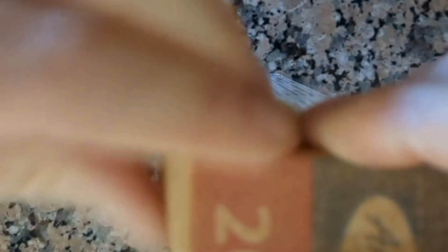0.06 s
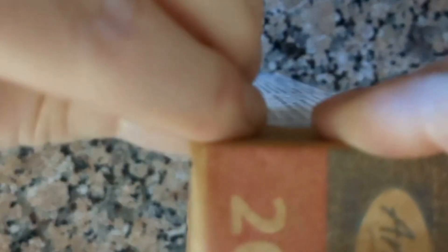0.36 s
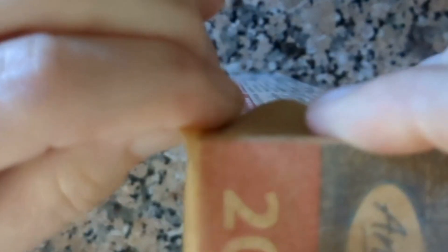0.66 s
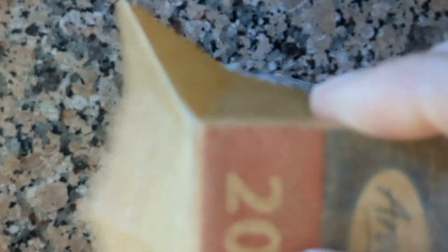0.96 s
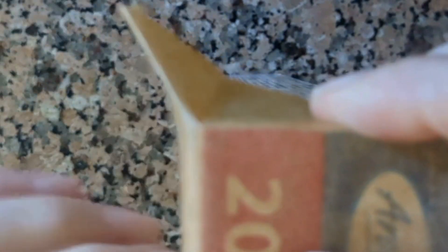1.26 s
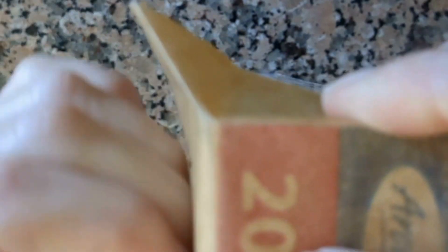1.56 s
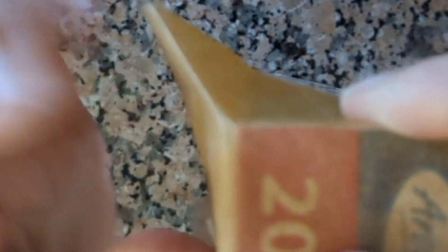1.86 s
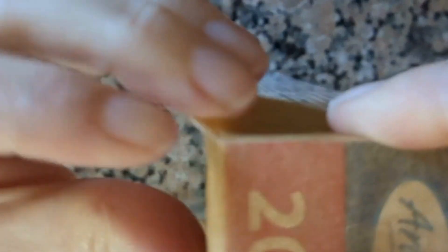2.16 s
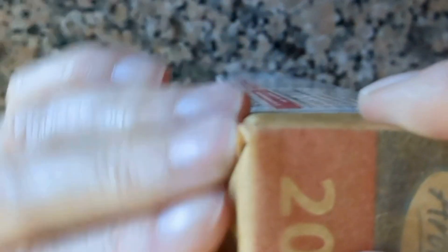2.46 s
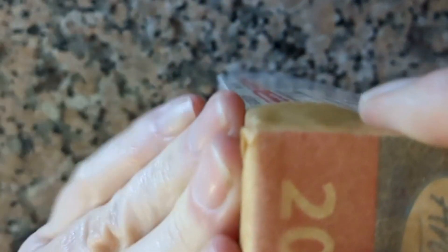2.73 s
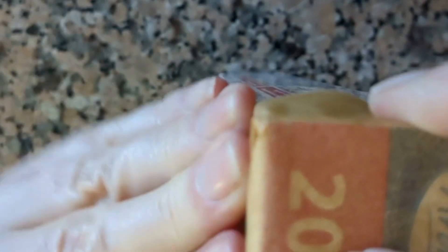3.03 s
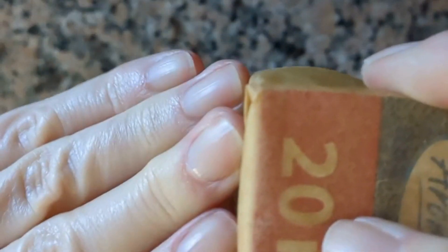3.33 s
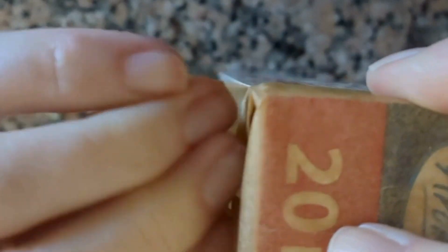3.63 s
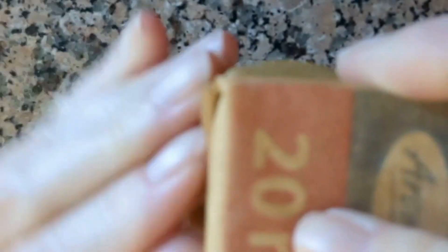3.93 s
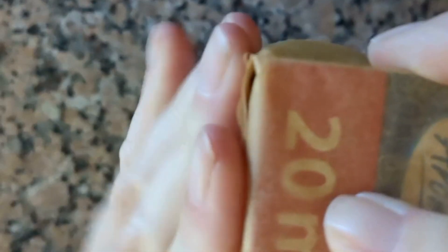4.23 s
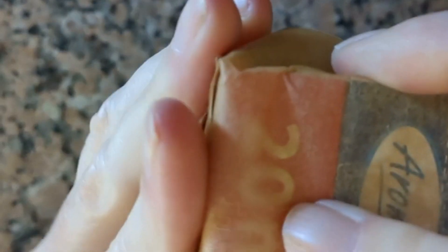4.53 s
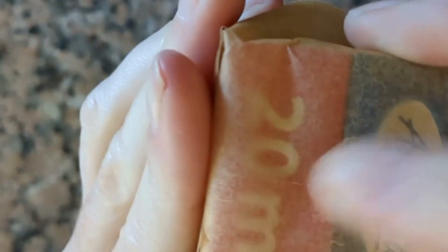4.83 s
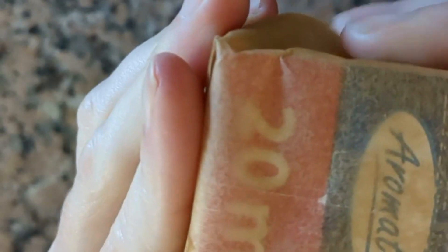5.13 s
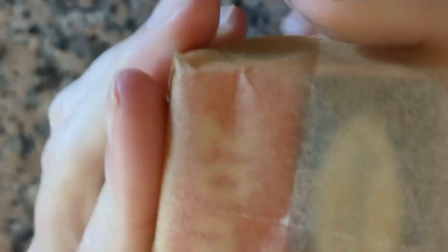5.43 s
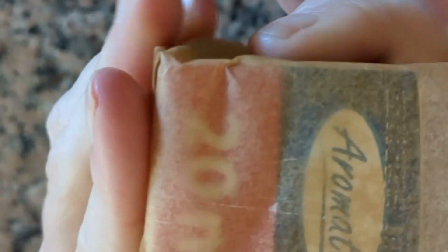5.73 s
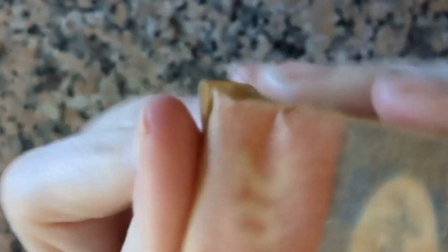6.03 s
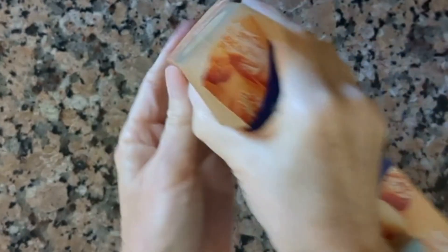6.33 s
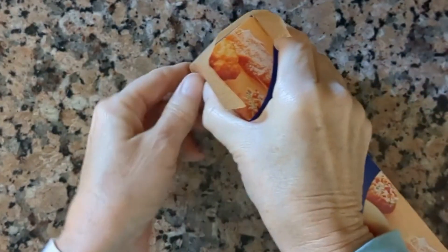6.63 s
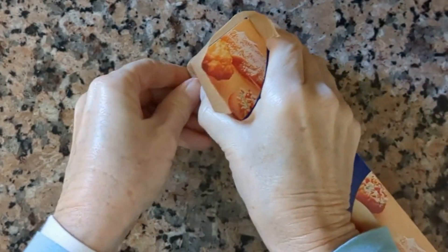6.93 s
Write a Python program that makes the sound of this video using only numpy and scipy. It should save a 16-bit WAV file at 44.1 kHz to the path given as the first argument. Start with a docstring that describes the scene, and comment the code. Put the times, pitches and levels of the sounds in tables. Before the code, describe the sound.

Hands fold and crease baking paper around a cardboard box, rustling and snapping in bursts, with light knocks and a hollow thump.

```python
"""Hands fold baking paper round the end of a cardboard box, close up, over a stone worktop in a kitchen.
From the start, each finger stroke rubs out a grainy rustle and sets off small creases, while big creases
buckle with sharp snaps that ring briefly in the sheet. After a second or so, fingertips begin to knock
on the box; around five seconds, finger pads drag on it with a dull judder. Just after six seconds it is
tipped over with a hollow thump, and a last rustle and a few snaps follow."""
import sys
import numpy as np
from scipy import signal
from scipy.fft import rfft, irfft, next_fast_len
from scipy.io import wavfile
from scipy.ndimage import uniform_filter1d

SR = 44100
rng = np.random.default_rng(int(sys.argv[2]) if len(sys.argv) > 2 else 0)


def master(y):
    """Save y as 16-bit WAV."""
    cut = np.clip(np.atleast_2d(y).T, -1, 1)
    pcm = np.round(cut * 32767)  # scale
    wavfile.write(sys.argv[1], SR, pcm.astype(np.int16))


N = 317079
RIGHT_LAG_S = .00052

# Finger strokes over the paper. Each row: start in seconds, length in seconds, level midway in dB,
# swell from start to end in dB, treble over body in dB.
STROKES = [(0.022, .04, -58, 3.5, -11), (0.083, .06, -43, -2.5, -1), (0.137, .16, -57, 1, 0),
           (0.509, .045, -66, -9, -8), (0.609, .07, -56.5, -33, -3), (0.785, .09, -55, 5.5, -2),
           (0.952, 0.047, -42, 3, -0.5), (1.252, 0.24, -51.5, -8, -2), (1.595, 0.043, -54, -8, -9),
           (1.678, .19, -56, -8, 0), (2.185, .11, -64.5, -7.5, -12), (2.394, .1, -57, 10.5, 2.5),
           (2.541, .14, -54, 6.5, 3), (2.973, .05, -57.5, -14, 4), (3.173, .09, -58, -10, 2.5),
           (3.362, .07, -49.5, -8.5, -7), (3.475, .25, -59.5, 2, 0.5), (3.746, .05, -48.5, 15, 4.5),
           (3.913, .17, -51.5, -7, 4), (4.321, .07, -54, -3.5, -9), (4.483, .22, -63.5, -11.5, -2),
           (4.767, .43, -49.5, 0, -3), (5.205, .055, -45, 2, 1), (5.282, .48, -61.5, -5, -3),
           (5.786, 0.23, -53.5, 0.5, -2), (6.236, .47, -57.5, 1.5, 1), (6.817, .37, -56, -5, 2.5)]
# Pressing paper on cardboard adds lows. Each row: time in seconds, lows relative to the body in dB.
CONTACT = [(0, -7.5), (.95, -14.5), (1.4, -9.5), (2.1, -20.5), (4.2, -18), (4.9, -11), (6.0, -9.5),
           (6.24, -1), (6.75, -18.5)]
# The body, low and treble bands of the sound. Each row: lower edge in Hz, upper edge in Hz.
BANDS = [(1200, 5000), (250, 1200), (5000, 16500)]


def snaps(crack_s=0.00036, ring_t60=0.054, shadow_db=-17, bounce_s=0.0014, bounce_db=-17,
          facet_q=4, facet_db=11, scatter_db=3, low_trim_db=-1):
    """A crease flips with a crack, then bending waves run about the sheet and die."""
    # Each row: start in seconds, body in dB, treble in dB, the crack's share of the energy from 0 to 1,
    # pitch of the flipping facet in Hz.
    big_creases = [(0.0682, -38, -40, 0.24, 1930), (0.1017, -41.5, -36, 0.1, 10600),
                   (0.1125, -37.5, -35, 0.04, 1530), (0.3672, -37.5, -41, 0.46, 2380),
                   (0.6058, -49.5, -38.5, 0.82, 9100), (0.7697, -46, -44.5, 0.3, 2550),
                   (0.815, -38.5, -62, 0.5, 1650), (0.919, -49, -45.5, 0.1, 9900),
                   (0.937, -42, -40.5, 0.2, 8900), (1.29, -40, -50, 0.1, 3440),
                   (1.3025, -34.5, -34, 0, 3300), (1.7109, -41, -40.5, 0.35, 1460),
                   (1.781, -40.5, -51, 1, 1620), (1.823, -33.5, -31, 0.75, 2160),
                   (2.2605, -48, -71, 0.65, 2180), (2.2805, -46.5, -52, 0.55, 3970),
                   (2.2995, -50, -50, .7, 3700), (2.349, -44, -44.5, 0.34, 2500),
                   (2.396, -39, -35.5, 0, 2020), (2.4781, -43.5, -36.5, 0, 6500),
                   (2.5102, -32, -36.5, 0.4, 1840), (2.5896, -34.5, -25, 0.92, 11000),
                   (2.6362, -41, -31, 0, 6530), (2.8551, -51.5, -48, 0.15, 1950),
                   (2.948, -50.5, -49, 0.5, 2460), (3.1208, -47, -46.5, 0.7, 3400),
                   (3.2237, -37.5, -48.5, 0.15, 3900), (3.3866, -55, -43, 0, 3270),
                   (3.4645, -43.5, -44.5, 0.7, 2280), (3.5015, -39.5, -34, 0.4, 8300),
                   (3.6308, -51.5, -40, 0.16, 6540), (3.742, -41, -29, 0.6, 6840),
                   (3.747, -34, -27, 0.88, 9400), (3.7708, -34.5, -29, .3, 7100),
                   (3.8392, -38.5, -32.5, 0.75, 4370), (3.9088, -35.5, -32, 0.78, 10900),
                   (3.9345, -39, -38, 0.6, 3700), (3.9499, -35, -33, 0.13, 6300),
                   (4.029, -34.5, -35, 0.1, 1820), (4.0477, -33.5, -33.5, 0.2, 8600),
                   (4.0938, -61, -39, 0.84, 10400), (4.1208, -46, -41.5, 0.4, 7050),
                   (4.2331, -54, -54, 0.82, 5200), (4.325, -55.5, -41.5, 0.3, 8200),
                   (4.3444, -45.5, -29, 0.86, 9650), (4.5032, -50.5, -45.5, 0.1, 2700),
                   (4.6171, -44.5, -37.5, 0.71, 10000), (4.655, -52.5, -43, 0.87, 14400),
                   (4.7205, -42.5, -39, 0, 4130), (4.8414, -44.5, -33, 0.54, 13200),
                   (4.8578, -42.5, -39, .8, 2050), (4.9943, -39.5, -40, 0.4, 4300),
                   (5.2235, -34.5, -43, 0.1, 2200), (5.2465, -40.5, -48, 0.1, 2200),
                   (5.2736, -38, -37, 0.54, 3440), (5.4253, -36.5, -41.5, 0.1, 1850),
                   (5.4367, -31.5, -39.5, 0.53, 2200), (5.4477, -39, -38, 0.9, 1990),
                   (5.5088, -32, -29.5, 0.62, 6260), (5.553, -31.5, -32.5, 0.2, 2090),
                   (5.6087, -40, -51, 0.7, 1480), (5.8324, -31, -33.5, 0.74, 5000),
                   (5.8545, -48, -43, 0.9, 3200), (5.9265, -69, -38.5, 0.93, 11700),
                   (5.9811, -31.5, -31.5, 0.78, 2190), (6.1859, -60, -48, 0.74, 8800),
                   (6.2345, -38.5, -49, 0.25, 2470), (6.324, -52, -46, 1, 7000),
                   (6.868, -36.5, -34, 0, 4680), (7.1073, -45, -41.5, 0.34, 4380),
                   (7.1411, -37, -42.5, 0.34, 3730)]
    starts, body_db, treble_db, share, facet_hz = np.vstack([big_creases, small_creases()]).T
    low_db = body_db + np.interp(starts, *np.transpose(CONTACT)) + low_trim_db
    share = np.clip(share, .01, .97)[:, None]
    t = np.arange(int(.08 * SR)) / SR
    burst, common, own, steps = rng.standard_normal((len(starts), 4, len(t))).swapaxes(0, 1)
    crack = burst * t * np.exp(-t / crack_s)
    crack *= np.sqrt(share / np.sum(crack ** 2, axis=1, keepdims=True))
    envelope = (1 - np.exp(-t / 0.0014)) * from_db(-60 * t / ring_t60)
    # the crease gives way in uneven steps
    envelope = envelope * from_db(scatter_db * rms_one(uniform_filter1d(steps, size=48)))
    envelope *= np.sqrt((1 - share) / np.sum(envelope ** 2, axis=1, keepdims=True))
    ring = stereo(common * envelope, own * envelope, alike=0.1) * pan(left_db=3.5)[:, None]
    # the right side is shaded from the crack but gets its bounce off the worktop
    bounce = from_db(bounce_db) * delay(crack, bounce_s)
    far_crack = delay(from_db(shadow_db) * crack + bounce, RIGHT_LAG_S)
    # the facet that flips rings at its own pitch, the smaller the higher
    facet = (facet_hz[:, None], facet_hz[:, None] / facet_q, facet_db)
    bands = sheet(ring + np.stack([crack, far_crack]), [facet])
    sounds, out = 0, np.zeros((2, N))
    for band, db in zip(bands, (body_db, low_db, treble_db)):
        attack_rms = np.sqrt(np.mean(band[..., t < .014] ** 2, axis=(0, 2)))
        sounds = sounds + band * (from_db(db) / attack_rms)[:, None]
    for k, start in enumerate(starts):
        add(out, start, sounds[:, k])
    return out


def small_creases(count=70, lowest_hz=1500, highest_hz=11000, strongest_db=1):
    """Small creases give way at random during strokes, scaled to the rubbing; rows as for big creases."""
    when, size, crack_share, pitch = rng.random((count, 4)).T
    spans = [np.arange(round(start * SR), min(round((start + length) * SR), N))
             for start, length, *_ in STROKES]
    moving = np.concatenate(spans)
    at = moving[(when * len(moving)).astype(int)]
    lift_db = strongest_db + 10 * np.log10(1 - size)
    body_db, treble_db = rubbing()
    facet_hz = lowest_hz * (highest_hz / lowest_hz) ** pitch
    return np.column_stack([at / SR, body_db[at] + lift_db, treble_db[at] + lift_db, crack_share, facet_hz])


def rustle(slips_per_s=950, size_db=3.0, clump_db=4, hiss_db=-5, flutter_db=3.3, trim_db=-1):
    """Fibres catch and slip in clumps of tiny ticks, over the smooth hiss of skin on paper."""
    slipping = rng.random(N) < slips_per_s * from_db(clump_db * drift(60)) / SR
    slips = slipping * rng.choice([-1, 1], N) * from_db(size_db * np.minimum(rng.exponential(1, N), 4))
    t = np.arange(int(.03 * SR)) / SR
    # every facet of the sheet starts with a tick and rings in its own way
    facets = rng.standard_normal((16, 2, len(t))) * (from_db(-60 * t / .03) + 4 * np.exp(-t / .0006))
    struck = rng.integers(len(facets), size=N)
    ticks = sum(signal.oaconvolve((slips * (struck == k))[None], facet, axes=1)[:, :N]
                for k, facet in enumerate(facets))
    # big or small, the slips together release what the hand puts in
    power = uniform_filter1d(np.mean(ticks ** 2, axis=0), size=2000)
    ticks = ticks / np.sqrt(np.abs(power) + 1e-9)
    force = ticks + from_db(hiss_db) * rng.standard_normal((2, N))
    bands = sheet(stereo(*force, alike=0.067) * pan(left_db=4))
    body_db, treble_db = rubbing()
    levels = (body_db, body_db + automation(CONTACT)[0], treble_db)
    pressure_db = trim_db + flutter_db * drift(60)  # the fingers press unevenly
    return sum(rms_one(band) * from_db(db + pressure_db) for band, db in zip(bands, levels))


def rubbing(grip_db_per_s=1983, release_db_per_s=409, resting_db=-83):
    """Body and treble envelopes in dB: each stroke grips fast, swells or fades, and lets go more slowly."""
    t = np.arange(0, N, 32) / SR
    body = treble = from_db(resting_db) ** 2
    for start, length, db, swell_db, bright_db in STROKES:
        held = np.clip(t, start, start + length)
        fade_db = grip_db_per_s * np.maximum(held - t, 0) + release_db_per_s * np.maximum(t - held, 0)
        level = from_db(db + swell_db * ((held - start) / length - .5) - fade_db)
        body = body + level ** 2
        treble = treble + (level * from_db(bright_db)) ** 2
    return automation(np.column_stack([t, 10 * np.log10(body), 10 * np.log10(treble)]))


def sheet(force, facets=()):
    """What paper and box radiate when excited, split into body, low and treble."""
    # The paper's tone. Each row: frequency in Hz, gain in dB.
    paper_eq = [(150, 12.5), (450, -9.5), (850, -1), (1550, 0.5), (2300, 2.5), (2800, -3.5), (8000, -7),
                (11500, -4), (15500, -14.5)]
    # Resonances of the wrapped box. Each row: centre in Hz, width in Hz, boost in dB.
    box_peaks = [(618, 150, 13.5), (1650, 200, 6.5), (3430, 1820, 8.5)]
    sound = colour(force, paper_eq, [*box_peaks, *facets])
    return [bandpass(sound, edges, order=3) for edges in BANDS]


def knocks(contact_s=0.00013, scuff_db=-14, scuff_t60=.06, falloff_db_per_octave=12):
    """A fingertip lands with a push and a scuff; the wall rings most in the modes near that spot's pitch."""
    # Each row: start in seconds, peak level in dB, pitch of the spot in Hz.
    taps = [(1.303, -35.5, 680), (1.711, -38.5, 700), (1.778, -37.5, 700), (1.824, -41, 700),
            (1.968, -48.5, 870), (3.535, -35, 1530), (4.187, -45, 1560), (4.381, -39, 1470),
            (4.478, -47.5, 446), (4.808, -35, 460), (5.26, -37, 220), (5.757, -36.5, 1460),
            (5.831, -38, 190)]
    # Modes of the cardboard wall. Each row: frequency in Hz, level in dB, time to fall 60 dB in seconds.
    wall_modes = [(144, -6.5, .1), (256.5, -2, 0.047), (426, -7, 0.039), (644.3, 2, 0.068),
                  (1650, 11.5, 0.038)]
    t, out = np.arange(SR // 8) / SR, np.zeros((2, N))
    for start, peak_db, spot_hz in taps:
        scuff = rng.standard_normal((2, len(t))) * from_db(scuff_db - 60 * t / scuff_t60)
        force = stereo(*(np.exp(-t / contact_s) + scuff), alike=0.31)
        wall = np.zeros(len(t))
        for hz, db, t60 in wall_modes:
            mode_db = db - falloff_db_per_octave * abs(np.log2(hz / spot_hz))
            wall += from_db(mode_db - 60 * t / t60) * np.sin(2 * np.pi * hz * t)
        knock = signal.oaconvolve(force, wall[None], axes=1)
        add(out, start, from_db(peak_db) * knock / np.abs(knock).max())
    return out


def thump(attack_s=0.012):
    """Soft bumps set the hollow box booming as it is tipped over."""
    # Each row: start in seconds, gain in dB.
    bumps = [(6.235, -36), (6.32, -46), (6.393, -54)]
    # Modes of the hollow box. Each row: frequency in Hz, level in dB, time to fall 60 dB in seconds.
    hollow_modes = [(63, -2.5, 0.28), (92.5, 11, 0.22), (197, 2.5, 0.1), (288, -4.5, 0.096),
                    (603, -14, 0.27), (1010, -2, 0.094)]
    t, out = np.arange(SR // 2) / SR, np.zeros((2, N))
    for start, gain_db in bumps:
        boom = sum(from_db(db - 60 * t / t60) * np.sin(2 * np.pi * (hz * t + rng.random()))
                   for hz, db, t60 in hollow_modes)
        add(out, start, from_db(gain_db) * boom * (1 - np.exp(-t / attack_s)))
    return out


def drags(band_hz=(190, 380), judder_db=3, judders_per_s=70):
    """A finger pad sticks and slips on the wall of the box, swelling and fading as it passes."""
    # Each row: start in seconds, length in seconds, level midway in dB.
    passes = [(4.782, 0.42, -58)]
    friction = bandpass(stereo(*rng.standard_normal((2, N)), alike=0.24), band_hz)
    judder = rms_one(friction * from_db(judder_db * drift(judders_per_s)))
    t = np.arange(N) / SR
    return judder * sum(from_db(db) * np.sin(np.pi * np.clip((t - start) / length, 0, 1))
                        for start, length, db in passes)


def handling(level_db=-71, follow=0.4, lumpy_db=2):
    """Rubbing also stirs the cardboard, with a dull, lumpy murmur that swells less than the rustle."""
    # The tone of cardboard under a fingertip. Each row: frequency in Hz, gain in dB.
    cardboard_eq = [(20, -5.5), (60, 5), (105, 8.5), (300, -18), (1500, -41.5)]
    low_db = rubbing()[0] + automation(CONTACT)[0]
    swell_db = follow * (low_db - np.median(low_db)) + lumpy_db * drift(35)
    return from_db(level_db + swell_db) * noise_bed(cardboard_eq)


def kitchen_reverb(x, body_t60=0.34, low_t60=0.43, treble_t60=0.23, predelay_s=0.01,
                   wet_db=-15, treble_db=-2):
    """Diffuse reflections off hard walls, different left and right, the treble dying first."""
    t, tail = np.arange(SR // 2) / SR, 0
    for edges, t60, db in zip(BANDS, (body_t60, low_t60, treble_t60), (0, 0, treble_db)):
        band = bandpass(rng.standard_normal((2, len(t))), edges)
        decay = from_db(-60 * t / t60)
        tail = tail + band * decay / np.linalg.norm(decay) * from_db(db)
    return from_db(wet_db) * signal.oaconvolve(x[:1], delay(tail, predelay_s), axes=1)[:, :N]


def room_tone(level_db=-87):
    """The quiet room: a faint, steady, dark noise."""
    # Each row: frequency in Hz, gain in dB.
    room_eq = [(20, -7), (120, -10), (400, -13), (16000, -40)]
    return from_db(level_db) * noise_bed(room_eq)


def noise_bed(eq, side_db=-9):
    """Coloured noise with a narrow stereo image; rms 1."""
    mid, side = colour(rng.standard_normal((2, N)), eq)
    return rms_one(mid + from_db(side_db) * side * [[1], [-1]])


def colour(x, eq, peaks=()):
    """Minimum-phase filter from an EQ curve with resonances on top."""
    size = next_fast_len(x.shape[-1] // 2 + 1024) * 2
    hz = np.maximum(np.arange(size // 2 + 1) * SR / size, 1)
    eq_hz, eq_db = np.transpose(eq)
    db = np.interp(np.log(hz), np.log(eq_hz), eq_db)
    for centre, width, boost in peaks:
        db = db + boost / (1 + (2 * (hz - centre) / width) ** 2)
    cepstrum = irfft(np.log(from_db(db)))[..., :size // 2]
    cepstrum[..., 1:] *= 2
    return irfft(rfft(x, size) * np.exp(rfft(cepstrum, size)))[..., :x.shape[-1]]


def bandpass(x, edges_hz, order=2):
    return signal.sosfilt(signal.butter(order, edges_hz, "band", fs=SR, output="sos"), x)


def stereo(common, own, alike):
    """The sound reaches the right side later, and partly by other paths."""
    return np.stack([common, delay(alike * common + np.sqrt(1 - alike ** 2) * own, RIGHT_LAG_S)])


def pan(left_db):
    return from_db([[left_db / 2], [-left_db / 2]])


def from_db(db):
    return 10 ** (np.asarray(db) / 20)


def rms_one(x):
    return x / np.sqrt(np.mean(x ** 2) + 1e-20)


def automation(rows):
    """Breakpoints, time first, drawn out to one curve per value column."""
    times, *columns = np.transpose(rows)
    return [np.interp(np.arange(N) / SR, times, column) for column in columns]


def drift(knots_per_s):
    """A random wander of rms 1."""
    knots = rng.standard_normal(4000)
    return rms_one(np.interp(np.arange(N) / SR * knots_per_s, np.arange(len(knots)), knots))


def delay(x, seconds):
    silence = np.zeros(x.shape[:-1] + (round(seconds * SR),))
    return np.concatenate([silence, x], axis=-1)[..., :x.shape[-1]]


def add(out, start_s, sound):
    at = max(round(start_s * SR), 0)
    out[..., at:at + sound.shape[-1]] += sound[..., :N - at]


def scene():
    """Paper and box in the kitchen, over the murmur of handling and the quiet room."""
    direct = snaps() + rustle() + knocks() + drags() + thump()
    return direct + kitchen_reverb(direct) + handling() + room_tone()


def record(dry, cutoff_hz=16100):
    """A steep low-pass takes off the very top."""
    return signal.sosfilt(signal.ellip(10, .1, 90, cutoff_hz, fs=SR, output="sos"), dry)


dry = scene()
out = record(dry)
master(out)
```